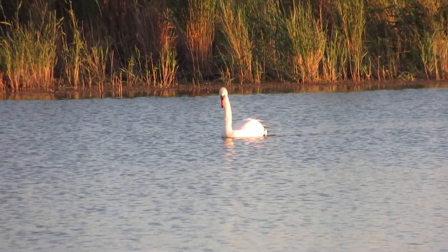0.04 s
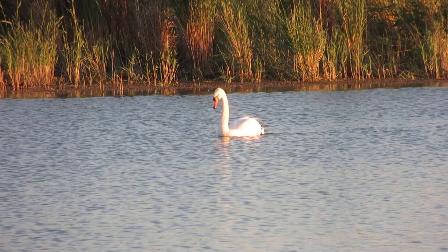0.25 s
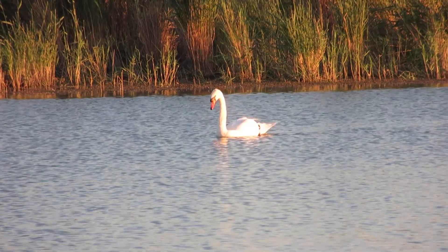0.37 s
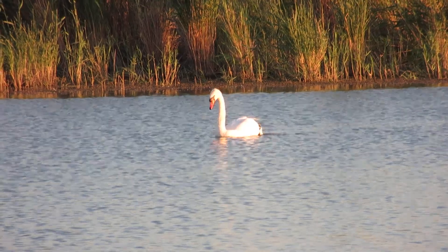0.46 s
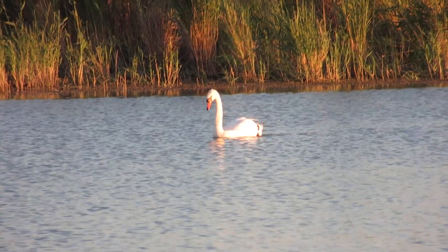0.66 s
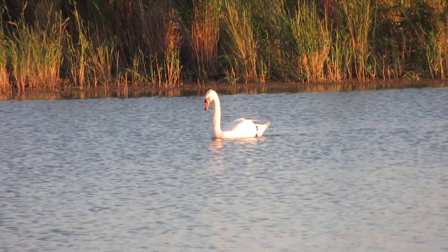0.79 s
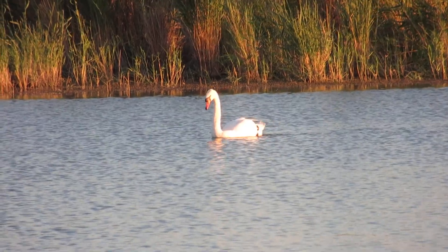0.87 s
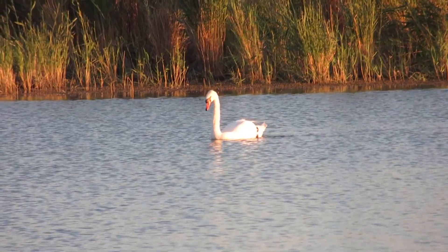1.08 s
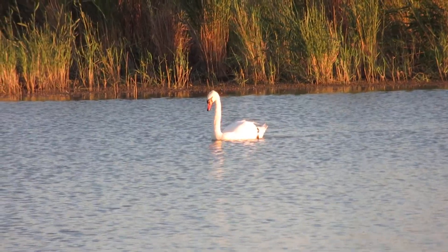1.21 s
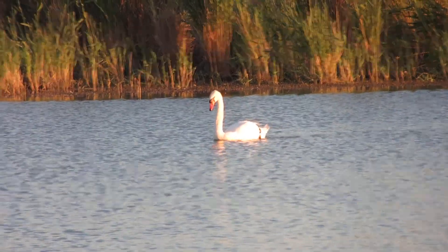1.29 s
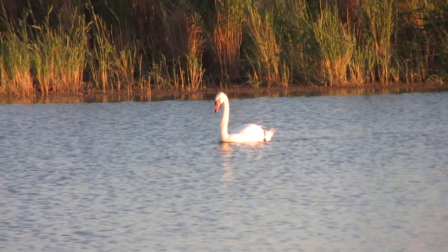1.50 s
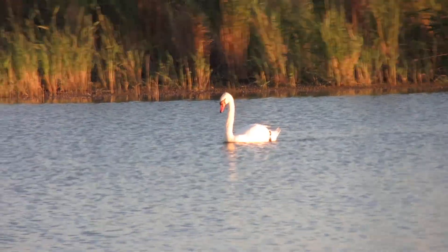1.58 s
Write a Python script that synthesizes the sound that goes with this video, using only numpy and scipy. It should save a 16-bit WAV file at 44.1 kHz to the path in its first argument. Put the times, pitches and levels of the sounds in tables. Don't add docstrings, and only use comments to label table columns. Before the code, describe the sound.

A swan's single honk sweeps upward, breaks, then a short arched toot echoes over water

```python
import sys
import numpy as np
from scipy import signal
from scipy.fft import rfft, irfft
from scipy.io import wavfile
from scipy.ndimage import uniform_filter1d

SR = 44100
rng = np.random.default_rng(int(sys.argv[2]) if len(sys.argv) > 2 else 0)


def digitize_waveform(pressure):
    field = np.atleast_2d(pressure).T
    bounded = np.clip(field, -1, 1)
    quanta = np.round(bounded * 32767).astype(np.int16)
    wavfile.write(sys.argv[1], SR, quanta)


def boost(x):
    u = np.asarray(x, float) / 20
    return 10 ** u


N = 72765


def level(x, db):
    return x * boost(db) / np.sqrt(np.mean(x ** 2))


def walk(rate_hz):
    k = int(SR / rate_hz)
    steps = np.repeat(rng.standard_normal(N // 20), k)[:N]
    smooth = uniform_filter1d(uniform_filter1d(steps, k), k)
    return smooth / smooth.std()


def bump(t, centre_s, width_s):
    return np.exp(-0.5 * ((t - centre_s) / width_s) ** 2)


# [t/s, pitch f/Hz, level/dB, overtone level/dB]
RISE = [
    (0.0, 413, -62.5, -42),
    (0.022, 426, -59.5, -6),
    (0.12, 472.8, -56, -3),
    (0.216, 576.4, -44.5, -6),
    (0.254, 644, -37, -3),
    (0.286, 626, -43, -6),
    (0.31, 603, -42, -23),
]
HONK = [
    (.31, 610, -35, -14),
    (0.327, 702, -32, -5),
    (0.34, 731.4, -31, -10.5),
    (0.37, 736.3, -27, -12.5),
    (0.396, 813.6, -25.5, -10.5),
    (0.418, 826.2, -27, -12),
    (0.433, 886.6, -26, -9),
    (.448, 806.7, -27.5, -10.5),
    (0.469, 600, -50.5, -25),
]
TOOT = [
    (0.477, 444, -61.5, -26),
    (.494, 614.4, -44, -25),
    (.502, 730.7, -28.5, -9),
    (0.511, 785.3, -26.5, -16.5),
    (.526, 791.3, -28.5, -17),
    (.548, 722.2, -29.5, -8.5),
    (.562, 639.6, -35, -19),
    (0.587, 449, -60, 6),
    (.6, 401.6, -59.5, -3),
]
# [multiple of the pitch, level re overtone level/dB, left-right level/dB]
OVERTONES = [(2, 0, -7), (3, -16, -5), (4, -38, -4), (5, -28, -4)]
# [f/Hz, level/dB]
THROAT = [(1700, -14), (1900, -1), (2250, 0), (2650, 4), (3100, -10), (3550, 5), (3750, -4), (3950, 8),
          (4250, -10)]


def swan(t):
    pan_db, left_lag_s = -4.5, 0.000055
    waver_share, shimmer_db, waver_hz = 0.003, 0.5, 90
    crack_s, crack_length_s, crack_hz, crack_share = 0.454, 0.007, 240, 0.15
    s, pitch_hz, call_db, over_db = np.array(RISE + HONK[1:] + TOOT, float).T

    def glide(values):
        return uniform_filter1d(np.interp(t, s, values), size=120)

    def sides(db):
        return boost(np.array([[db], [-db]]) / 2)

    hz = glide(pitch_hz)
    phase = 2 * np.pi * np.cumsum(hz * (1 + waver_share * walk(waver_hz))) / SR
    fade = np.clip((s[-1] - t) / 0.012, 0, 1)
    gain = 2 ** 0.5 * boost(glide(call_db) + shimmer_db * walk(waver_hz)) * fade
    flutter = np.sin(2 * np.pi * crack_hz * t + walk(150))
    gain = gain * (1 + crack_share * bump(t, crack_s, crack_length_s) * flutter)
    phase = phase - np.array([[2 * np.pi * left_lag_s], [0]]) * hz
    out = sides(pan_db) * np.sin(phase)
    for k, rel_db, over_pan_db in OVERTONES:
        throat_db = (k > 2.5) * np.interp(k * hz, *np.array(THROAT).T)
        over_gain = boost(rel_db + throat_db + glide(over_db) + 2 * shimmer_db * walk(37))
        out = out - sides(over_pan_db) * over_gain * np.cos(round(k) * phase)
    return gain * out


# [t/s, level/dB, length/s, centre share level/dB]
PUFFS = [(0.036, -47.5, 0.05, -17), (0.091, -48.5, 0.02, -6.5), (0.197, -53.5, 0.02, -20),
         (0.272, -63, 0.031, -5), (0.33, -39, 0.018, -28), (0.422, -53.5, 0.039, -13),
         (0.607, -66.5, 0.07, -13.5), (0.96, -58.5, 0.054, -20), (1.153, -50, 0.018, -17),
         (1.25, -47, 0.016, -20), (1.325, -48.5, .015, -14), (1.413, -56, 0.027, -21),
         (1.531, -66, 0.028, -11), (1.636, -60, .02, -38)]


def wind(t):
    bed_db, own_bed_db, top_hz, leak_db = -63, -19, 88, -18
    low = signal.butter(3, [18, top_hz], "bandpass", fs=SR, output="sos")
    side = level(signal.sosfilt(low, rng.standard_normal(N)), 0)
    own = level(signal.sosfilt(low, rng.standard_normal(N)), 0)
    side_gain, own_gain = boost(bed_db), boost(bed_db + own_bed_db)
    for s, db, length_s, share_db in PUFFS:
        puff = bump(t, s, length_s)
        side_gain = side_gain + boost(db) * puff
        own_gain = own_gain + boost(db + share_db) * puff
    side = side * side_gain
    return boost(leak_db) * side + own * own_gain, side


def coloured_noise(table, top_hz):
    f = np.arange(N // 2 + 1) * SR / N + 1
    hz, db = np.array(table, float).T
    colour = boost(np.interp(np.log(f), np.log(hz), db))
    colour = colour / (1 + (hz[0] / f) ** 4) / (1 + (f / top_hz) ** 60)
    spectrum = rfft(rng.standard_normal(N)) * colour
    out = 0
    for centre_hz in 100 * 2 ** np.arange(0, 8, 0.5):
        band = np.clip(1 - np.abs(2 * np.log2(f / centre_hz)), 0, 1) ** 0.5
        out = out + irfft(spectrum * band, N) * boost(0.4 * walk(5.526))
    return out


# [f/Hz, level per Hz/dB]
MID = [(150, -7.5), (450, -13.5), (800, -9), (1050, -7.5), (1300, -6.5), (1900, -14), (3200, -13),
       (15000, -27)]
# [f/Hz, level per Hz/dB]
SIDES = [(88, -47), (150, 3), (274, 1), (302, 0.5), (1240, 2), (1370, 0), (4060, -9), (15500, -25.5)]


def hiss():
    return level(coloured_noise(MID, 15500), -58), level(coloured_noise(SIDES, SR / 2), -46.5)


def camera_whine(t):
    line_hz, start_turns, line_db, half_line_db = 15733.7, 0.465, -61.5, -75
    turn = 2 * np.pi * (line_hz * t + start_turns)
    return boost(line_db) * np.sin(turn) + boost(half_line_db) * np.sin(turn / 2)


# [t/s, length/s, start f/Hz, top f/Hz, end f/Hz]
CHIRPS = [
    (.07, .048, 2400, 2800, 3600),
    (.06, .05, 2900, 3100, 3900),
    (.832, .022, 2750, 3050, 3900),
    (.846, .014, 4100, 4400, 4000),
    (.858, .03, 3950, 3600, 3450),
    (.852, .018, 3800, 3450, 3150),
    (.876, .026, 3350, 2950, 2950),
    (.854, .028, 1480, 1250, 1520),
    (1.28, .045, 3500, 3900, 3500),
    (.02, .14, 1280, 1310, 1330),
]
CHIRP_DB = [-62, -67, -54, -58, -58, -58, -57, -58, -64, -60]


def birds(t):
    top_share, rough_db, scatter = 0.45, 3, 0.022
    out = 0
    for (s, length_s, start_hz, top_hz, end_hz), db in zip(CHIRPS, CHIRP_DB):
        u = np.clip((t - s) / length_s, 0, 1)
        bend = np.interp(u, [0, top_share, 1], [start_hz, top_hz, end_hz])
        hz = uniform_filter1d(bend, size=150) * (1 + scatter * walk(400))
        gain = boost(db + rough_db * walk(250)) * np.sin(np.pi * u) ** 0.5
        out = out + gain * np.sin(2 * np.pi * np.cumsum(hz) / SR)
    return out


# [delay t/s, level/dB]
BANKS = [
    (.05, -22),
    (.11, -29),
    (.19, -32),
    (.3, -36),
]


def lake(t, call):
    rise_s, bank_blur_s = 0.08, 0.011

    def tail(db, t60_s):
        decay = np.exp(-np.log(1000) * t / t60_s)
        return level(decay * np.clip(t / rise_s, 0, 1) ** 2, db) / N ** 0.5

    power = tail(-26, 0.78) ** 2 + tail(-27, 3.32) ** 2
    for delay_s, db in BANKS:
        power = power + level(bump(t, delay_s, bank_blur_s), db) ** 2 / N
    shared, own = rng.standard_normal(N), rng.standard_normal((2, N))
    response = power ** 0.5 * (shared + 0.5 * own)
    bright = signal.lfilter([1, -0.85], [1], call)
    bright = level(bright, 0) * call.std()
    return signal.fftconvolve(bright[None], response, axes=1)[:, :N]


def scene():
    t = np.arange(N) / SR
    call = swan(t)
    wind_mid, wind_side = wind(t)
    hiss_mid, hiss_side = hiss()
    mid = wind_mid + hiss_mid + birds(t)
    side = wind_side + hiss_side
    return call + lake(t, call.mean(axis=0)) + mid + side * np.array([[1], [-1]])


def low_pass(x):
    return signal.sosfilt(signal.butter(12, 15750, fs=SR, output="sos"), x)


def record(dry):
    mix = dry + camera_whine(np.arange(N) / SR)
    return low_pass(mix)


dry = scene()
out = record(dry)
digitize_waveform(out)
```